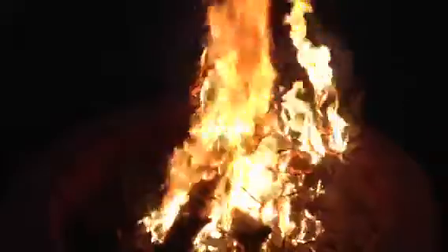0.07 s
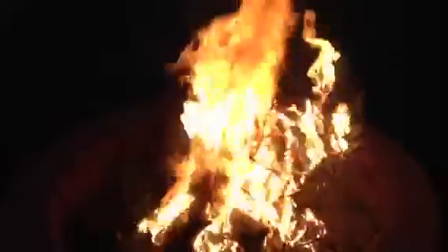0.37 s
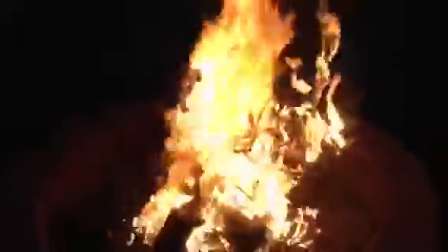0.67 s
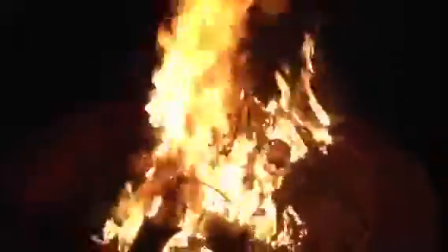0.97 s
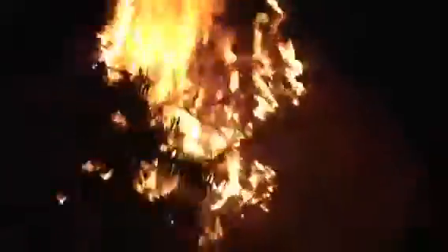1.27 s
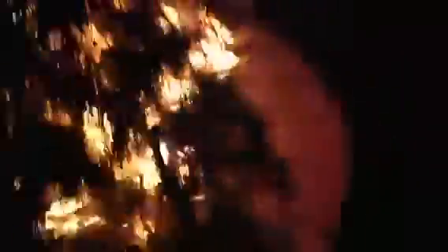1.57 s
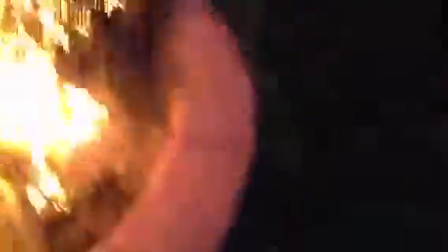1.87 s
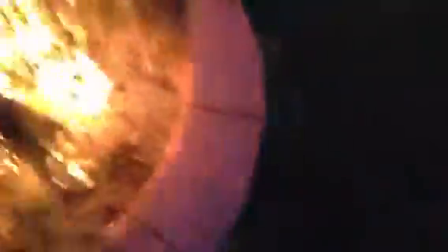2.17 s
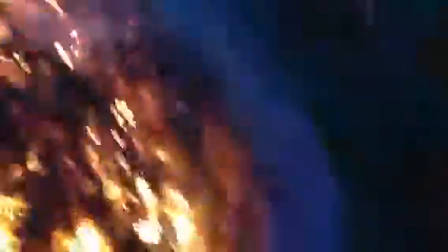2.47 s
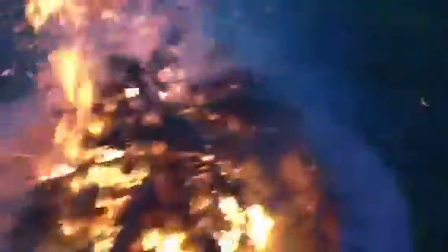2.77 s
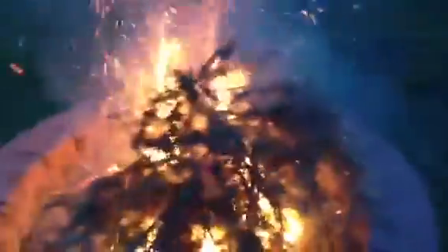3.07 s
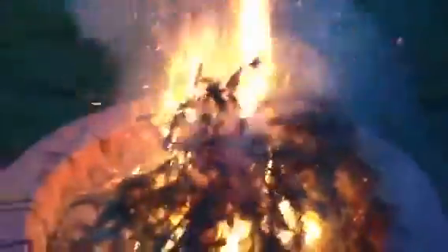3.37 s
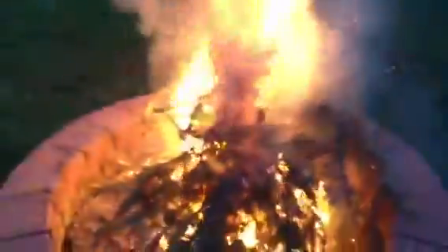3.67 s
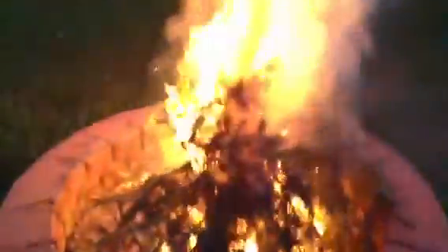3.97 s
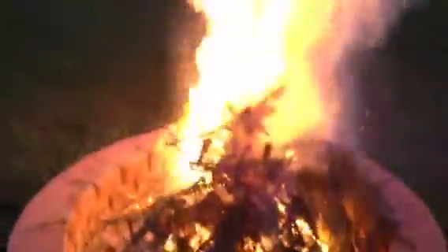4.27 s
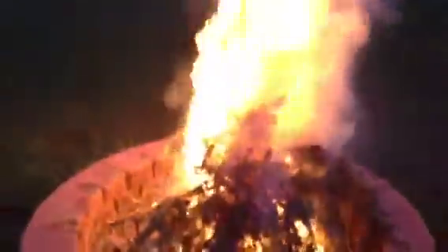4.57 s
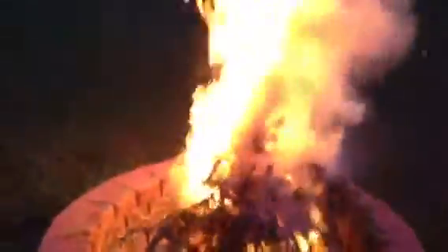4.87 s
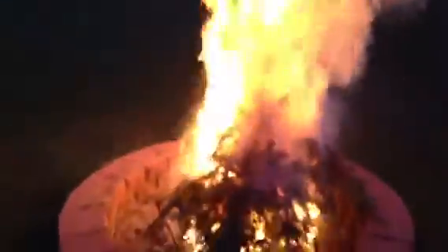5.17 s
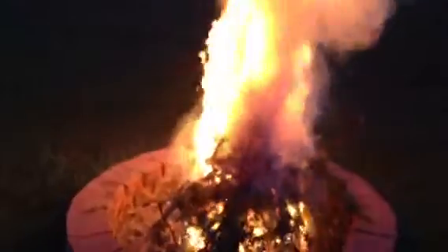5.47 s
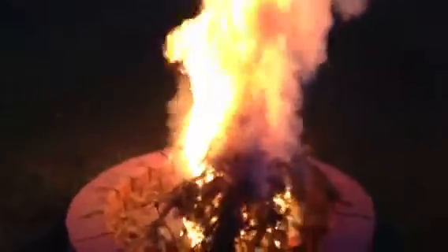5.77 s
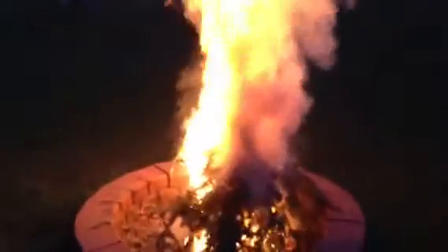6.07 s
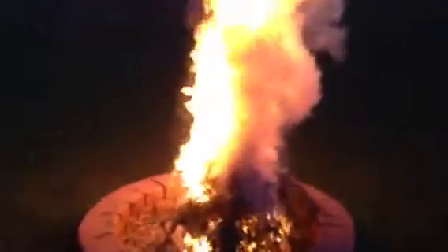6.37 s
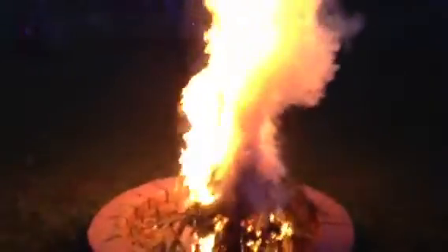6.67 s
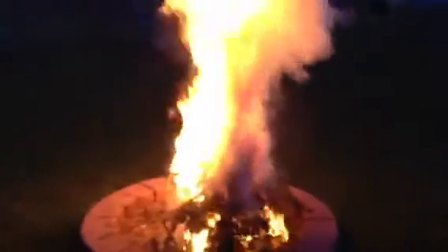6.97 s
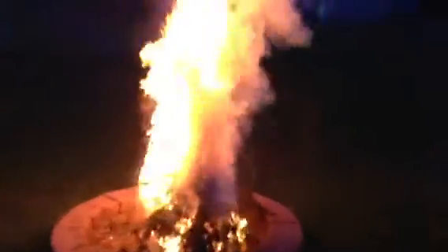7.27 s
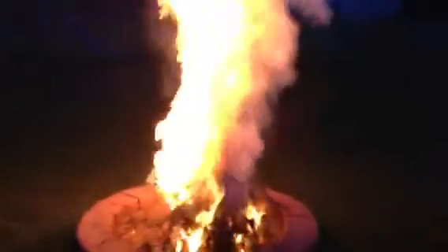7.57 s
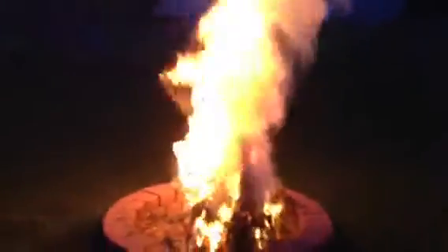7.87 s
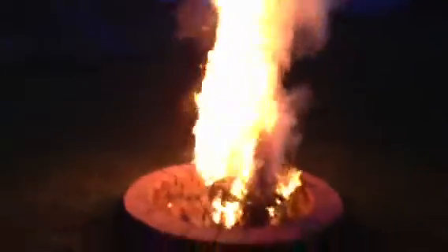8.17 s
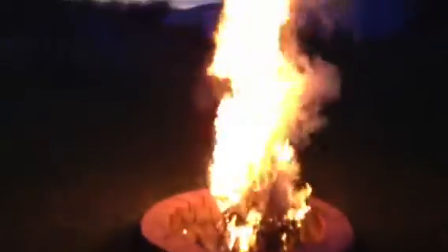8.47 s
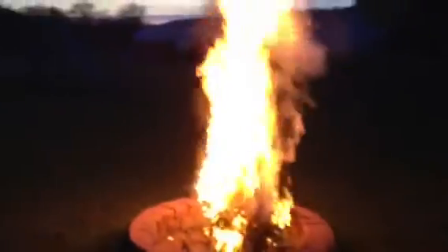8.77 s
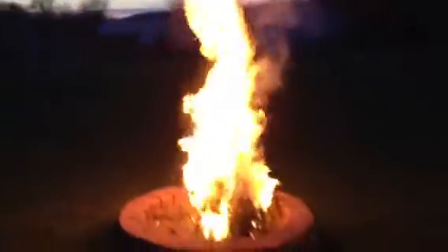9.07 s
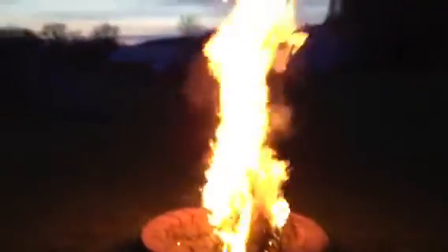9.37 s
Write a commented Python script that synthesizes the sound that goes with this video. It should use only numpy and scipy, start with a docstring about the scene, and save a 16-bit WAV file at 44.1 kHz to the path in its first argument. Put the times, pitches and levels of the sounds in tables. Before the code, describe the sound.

A close outdoor fire of dry branches pops sharply and catches into a thick, bright crackle while frogs peep in the background.

```python
"""Dusk beside a fire pit, one microphone close in, small frogs whistling all around it.
Dry evergreen branches smoulder: single needles tick and resin pockets pop. At 2.4 s they catch, and
thousands of needles burst over the low roar of the flames while whole sprigs spurt and a toad trills
in the distance. At 5.5 s, after a loud pop, the whole sound turns suddenly quieter. From about 7 s
a hand shifts beside the microphone, colours the sound and bumps the housing."""
import sys
import numpy as np
from scipy import signal
from scipy.fft import rfft, irfft, next_fast_len
from scipy.io import wavfile
from scipy.ndimage import map_coordinates

SR = 44100
rng = np.random.default_rng(int(sys.argv[2]) if len(sys.argv) > 2 else 0)


def generate_wav(sig):
    """Save sig (samples, or channels by samples) to the path in sys.argv[1] as 16-bit PCM at SR."""
    pcm = np.round(np.clip(np.atleast_2d(sig).T, -1, 1) * 32767).astype(np.int16)
    wavfile.write(sys.argv[1], SR, pcm)


N = 424683
TIME = np.arange(N) / SR
TOP_HZ = 15350  # the microphone's band limit


def amp(db):
    """Decibels as an amplitude factor."""
    return 10 ** (np.asarray(db) / 20)


def unit(x):
    """x at rms 1."""
    return x / np.sqrt(np.mean(x ** 2) + 1e-20)


def curves(rows, at=TIME):
    """Each column after the time, per sample or at the given times."""
    times, *columns = np.transpose(rows)
    return [np.interp(at, times, column) for column in columns]


def wobble(rate):
    """A smooth random curve, rate knots a second."""
    knots = rng.standard_normal(int(N * rate / SR) + 4)
    return map_coordinates(knots, [TIME * rate], order=2)


def colour(x, points, size=4096):
    """x through a causal filter of unit energy with the given (Hz, dB) shape."""
    points_hz, points_db = np.transpose(points)
    hz = np.fft.rfftfreq(size, 1 / SR)
    shape_db = np.interp(np.log(hz + 1), np.log(points_hz), points_db)
    cepstrum = irfft(np.log(amp(shape_db)))
    cepstrum[1:size // 2] *= 2  # fold to minimum phase
    cepstrum[size // 2 + 1:] = 0
    response = irfft(np.exp(rfft(cepstrum)))
    return signal.oaconvolve(x, response / np.linalg.norm(response))[:N]


def resonate(x, hz, q):
    """x through a single resonance."""
    return signal.lfilter(*signal.iirpeak(hz, q, SR), x)


def fade(x, life_s):
    """Every impulse of x spread over an exponential decay of this time constant."""
    keep = np.exp(-1 / (life_s * SR))
    return signal.lfilter([1 - keep], [1, -keep], x)


def add(track, s, sound):
    """Mix a sound into the track at time s."""
    start = max(round(s * SR), 0)
    part = track[start:start + len(sound)]
    part += sound[:len(part)]


def bursts(rate, spread_db, ceiling_db):
    """Energy of random bursts, mean 1: rate a second, many small and a few large."""
    size = amp(np.minimum(spread_db * rng.standard_normal(N), ceiling_db)) ** 2
    chance = rate / SR
    return (rng.random(N) < chance) * size / size.mean() / chance


def hiss(power):
    """White noise of random signs that follows a power envelope."""
    return np.sqrt(np.abs(power)) * np.sign(rng.standard_normal(N))


# How loud the crackle of needles and twigs is, close to the microphone, dropping abruptly at 5.5 s.
# Each row: time in seconds, needle level and twig level in relative dB.
CRACKLE_LEVEL = [(.13, -40.5, -51), (.58, -47, -52), (.72, -39.5, -49.5), (1.1, -46, -51.5),
                 (1.55, -43, -52.5), (1.85, -46.5, -53.5), (2.17, -42, -50.5), (2.36, -34.5, -48.5),
                 (2.42, -28, -45), (2.98, -26, -47.5), (3.3, -30, -47.5), (3.75, -25.5, -44.5),
                 (4.56, -26, -43), (4.62, -27, -43.5), (5, -25.5, -45), (5.42, -28.5, -45.5),
                 (5.5, -22.5, -47.5), (5.525, -32, -52.5), (6.3, -30, -49), (7.1, -31, -48.5),
                 (7.7, -30, -45), (8.3, -31, -44), (9.62, -32, -47.5)]
# The bright tone of the needles. Each row: frequency in Hz, relative level in dB.
NEEDLE_SPECTRUM = [(900, -40), (1900, -17), (2500, -12.5), (3400, -8.8), (4100, -6.2), (5700, -4.3),
                   (7000, -1.6), (8200, 0), (9900, -2.6), (11700, -.4), (13500, -.7), (15200, -2.5)]
# The lower tone of the twigs. Each row: frequency in Hz, relative level in dB.
TWIG_SPECTRUM = [(250, -30), (410, -13), (520, -3), (780, -.5), (1050, -2.5), (1350, -2), (1900, 0),
                 (2400, -.5), (3200, -9), (4200, -20), (7000, -35)]


def crackle(catch_db=-37):
    """Smouldering needles tick and vent steam; once they catch, they burst in dense clumps of clicks."""
    needle_db, twig_db = curves(CRACKLE_LEVEL)
    caught = 1 / (1 + np.exp((catch_db - needle_db) / 2))  # 0 smouldering, 1 alight
    # a sprig ignites at once, then its volley of clicks thins out
    volleys = .48 + .45 * fade(bursts(230, spread_db=1.5, ceiling_db=5), life_s=.0035)
    clumps = volleys * unit(amp(.65 * wobble(30))) ** 2
    click_rate = clumps * (1100 + 3900 * caught)
    clicks = clumps * bursts(click_rate, spread_db=8.5, ceiling_db=15 + 3 * caught)
    # each click scatters briefly through the pile
    direct, scatter = fade(clicks, life_s=.00003), fade(clicks, life_s=.00071)
    steam = fade(bursts(170 + 700 * caught, spread_db=6, ceiling_db=13), life_s=.0025)
    click_share, steady_hiss = .4 + .48 * caught, .1 - .05 * caught
    needle_power = click_share * (.75 * direct + .25 * scatter) + (1 - click_share) * steam + steady_hiss
    needles = colour(hiss(needle_power), NEEDLE_SPECTRUM)
    twigs = colour(hiss(.56 * direct + .33 * scatter + .39), TWIG_SPECTRUM)
    return amp(needle_db) * needles + amp(twig_db - 1) * twigs


# The big resin pockets bursting in the pit. Each row: start in seconds, levels of crack, steam and
# wood knock in relative dB, knock pitch in Hz.
RESIN_POPS = [(0.142, -14.5, -35.5, -36, 1800), (.168, -19, -36, -30, 1800), (0.4056, -20, -27, -34, 2200),
              (.6396, -6.5, -27, -22, 1700), (0.6478, -12, -32, -30, 1870), (0.7008, -8, -16, -15.5, 1280),
              (.853, -47, -56, -25.5, 1200), (0.9692, -22, -33, -33, 1500), (1.007, -33, -59, -26, 1350),
              (1.179, -48, -35, -29, 1340), (1.3037, -24, -29.5, -43, 1500),
              (1.4851, -17.5, -25.5, -21, 2200), (1.557, -16, -24.5, -29, 1500),
              (1.6773, -6, -23.5, -35, 2200), (1.703, -21, -37, -42, 2500), (1.878, -23, -31, -33, 1500),
              (1.899, -12, -20, -38, 2500), (1.9138, -21, -26, -38, 2010),
              (1.9295, -9.5, -26.5, -16.5, 1000), (2.012, -21, -26, -33, 1500),
              (2.127, -15.5, -35, -37, 2000), (2.1715, -19, -27, -24, 1500),
              (2.2037, -12, -31.5, -41, 2200), (2.255, -19, -29, -41, 1300), (2.2921, -10, -32, -36, 1380),
              (2.467, -2.5, -24, -42, 1300), (2.6415, -7.5, -25, -45, 1200), (2.787, -7.5, -19, -32, 1800),
              (2.82, -12, -21, -29, 700), (2.9065, -11, -26, -15, 2100), (2.9674, -20, -21, -23.5, 775),
              (2.981, -6.5, -27, -35, 2500), (3.988, -7, -26, -42, 1510), (4.418, -4, -33, -43, 1500),
              (4.43, -24, -31, -20.5, 900), (4.615, -12, -20.5, -50, 1500), (4.825, -8, -24, -40, 1500),
              (4.863, -13, -22, -31, 2800), (5.214, -11, -25, -28, 1700), (5.431, -14, -27.5, -44, 1500),
              (5.5073, -6, -29, -37, 1500), (6.995, -9, -24.5, -44, 1500), (9.1013, -10, -33, -42, 2000),
              (9.173, -9, -32, -44, 1500), (9.4924, -15, -31, -38, 1800), (9.543, -11, -37, -29, 1500)]
# The tone of a crack or needle snap at close range. Each row: frequency in Hz, relative level in dB.
SNAP_SPECTRUM = [(200, -42), (700, -6.5), (2000, -5), (6000, -1.5), (10000, -4), (15000, 2)]
# The tone of a knocking branch. Each row: frequency in Hz, relative level in dB.
KNOCK_SPECTRUM = [(150, -33), (450, 9.5), (1000, -1.5), (2500, -1.5), (3800, 3), (8000, -26)]


def resin_pops(crack_life_s=.00007, steam_life_s=.0034, knock_life_s=.0009):
    """A resin pocket splits with a sharp crack, steam whistles through the slit and the branch knocks."""
    sharp, dull = np.zeros(N), np.zeros(N)
    t = np.arange(SR // 40) / SR
    for s, crack_db, steam_db, knock_db, knock_hz in RESIN_POPS + small_pops():
        # a thick branch knocks harder and whistles lower: an octave for every 34 dB
        slit_hz = min(8760 * 2 ** (-(knock_db + 35.5) / 34), TOP_HZ)
        jet, wood = rng.standard_normal((2, len(t)))
        crack = np.cos(2 * np.pi * slit_hz * t) * np.exp(-t / crack_life_s)
        whistle = unit(resonate(jet, slit_hz, q=2))
        steam = (jet + .66 * whistle) * np.exp(-t / steam_life_s) * (1 - np.exp(-t / .0001))
        knock = resonate(np.sign(wood) * np.exp(-t / knock_life_s), knock_hz, q=2.2)
        add(sharp, s, amp(crack_db + 6) * crack + amp(steam_db + .5) * steam)
        add(dull, s, amp(knock_db + 4) * knock / np.linalg.norm(knock))
    return colour(sharp, SNAP_SPECTRUM) + colour(dull, KNOCK_SPECTRUM)


def small_pops(count=40, typical_db=(-18, -30, -39.5), scatter_db=2.5, knock_hz=1400):
    """Small pockets burst at random, louder where the crackle is loud: rows like those of RESIN_POPS."""
    jitter, pitch, *scatter = rng.standard_normal((count, 5)).T
    starts = np.clip((np.arange(count) + .5 + .5 * jitter) / count, 0, 1) * N / SR
    needle_db = curves(CRACKLE_LEVEL, at=starts)[0]
    lift_db = .22 * (needle_db - needle_db.mean())
    levels = np.array(typical_db)[:, None] + lift_db + scatter_db * np.array(scatter)
    return list(zip(starts, *levels, knock_hz * amp(3 * pitch)))


# Single dry needles that stand out of the crackle. Each row: start in seconds, relative level in dB.
NEEDLE_TICKS = [(0.158, -9), (0.215, -16), (0.2668, -29), (0.3107, -24), (0.3504, -15), (0.3956, -10),
                (0.4384, -21), (0.515, -12), (0.7327, -17), (0.818, -18), (0.8879, -25), (0.9065, -21),
                (1.0199, -19), (1.1667, -31), (1.2146, -22), (1.2443, -14.5), (1.3483, -32), (1.3736, -17),
                (1.4974, -24), (1.5724, -9), (1.649, -14.5), (1.882, -12), (1.9733, -18.5), (2.0823, -15),
                (2.1545, -15), (2.6489, -11), (2.922, -6), (2.9336, -8), (4.2143, -1.5), (4.3744, -6),
                (4.4014, -2.5), (4.492, -10), (5.4789, -14)]


def needle_ticks(snap_life_s=.0001, tail_life_s=.0021, ring_hz=5000):
    """A dry needle snaps, each at its own pitch, and the click scatters briefly through the pile."""
    track, t = np.zeros(N), np.arange(SR // 60) / SR
    envelope = np.exp(-t / snap_life_s) + amp(-13) * np.exp(-t / tail_life_s)
    for s, db in NEEDLE_TICKS:
        hz = min(ring_hz * amp(4 * rng.standard_normal()), TOP_HZ)
        click = np.sign(rng.standard_normal(len(t))) * envelope
        click = click + .86 * resonate(click, hz, q=2)
        add(track, s, amp(db + 4.5) * click / np.linalg.norm(click))
    return colour(track, SNAP_SPECTRUM)


# Whole sprigs going up in the pit. Each row: peak time in seconds, half width in seconds, level in dB.
SPRIG_SPURTS = [(2.44, 0.032, -27), (4.19, 0.014, -32), (4.385, 0.043, -33), (4.495, .012, -29),
                (4.77, 0.0065, -25.5), (4.87, 0.0094, -33), (5.49, 0.013, -30)]
# The tone of their sizzle. Each row: frequency in Hz, relative level in dB.
SPURT_SPECTRUM = [(1000, -40), (2500, -4), (4500, -3), (8000, 4.5), (11000, 0.5), (15000, -2.5)]


def sprig_spurts():
    """A sprig flares in a brief, dense volley of clicks."""
    swell = sum(amp(db) * np.exp(-.5 * ((TIME - s) / width) ** 2) for s, width, db in SPRIG_SPURTS)
    volley = fade(bursts(1500, spread_db=5, ceiling_db=10), life_s=.0003)
    return swell * colour(hiss(volley), SPURT_SPECTRUM)


# The deep roar over the pit. Each row: time in seconds, relative level in dB.
ROAR_LEVEL = [(.4, -54.5), (.85, -53.5), (2.3, -49), (2.8, -55.5), (3.5, -52), (4.5, -48), (5, -49.5),
              (5.7, -54), (7.2, -53.5), (7.5, -50.5), (7.9, -52), (9.62, -52.5)]
# The hollow flutter among the branches, strongest just before they catch.
# Each row: time in seconds, relative level in dB.
FLUTTER_LEVEL = [(1.1, -53.5), (2.15, -46.5), (2.55, -52.5), (3.3, -60), (4.5, -53), (5.4, -58), (6.2, -59)]
# Pockets of gas flaring. Each row: peak time in seconds, lift of the flutter in dB.
GAS_FLARES = [(3.91, 18.5), (4.3, 8), (4.53, 10)]
# The tones of the roar and the flutter. Each row: frequency in Hz, relative level in dB.
ROAR_SPECTRUM = [(20, -42), (50, -45), (70, -24), (100, -13), (135, -2), (190, 0.5), (250, 0), (320, -11),
                 (420, -32), (900, -37.5)]
FLUTTER_SPECTRUM = [(120, -28.5), (220, -18), (290, 2), (370, 0), (460, -3), (600, -11), (1200, -33)]


def flames(flare_half_width_s=.019):
    """Turbulent gas roars over the pit and flutters among the branches, swelling at each flare."""
    flare_db = sum(db * np.exp(-.5 * ((TIME - s) / flare_half_width_s) ** 2) for s, db in GAS_FLARES)
    roar_db = curves(ROAR_LEVEL)[0] - 1 + 1.5 * wobble(14)
    roar = amp(roar_db) * colour(rng.standard_normal(N), ROAR_SPECTRUM)
    flutter_db = curves(FLUTTER_LEVEL)[0] - .5 + flare_db + wobble(18)
    flutter = amp(flutter_db) * colour(rng.standard_normal(N), FLUTTER_SPECTRUM)
    return roar + flutter


# Soft bumps right on the microphone. Each row: start in seconds, relative level in dB, pitch in Hz.
HAND_BUMPS = [(7.322, -43, 130), (7.343, -41, 149), (7.373, -43, 170), (7.41, -46, 150), (7.454, -43, 200),
              (7.502, -40, 159), (7.535, -45, 140), (7.697, -44, 140), (7.728, -41, 130),
              (8.049, -39, 152.5), (8.394, -35.5, 161), (8.57, -37.5, 202), (8.731, -44, 125),
              (8.821, -45, 129)]


def hand_bumps(rise_s=.0031):
    """The hand nudges the housing: a low push of two or three cycles."""
    track, t = np.zeros(N), np.arange(SR // 16) / SR
    envelope = t / rise_s * np.exp(1 - t / rise_s)
    for s, db, hz in HAND_BUMPS:
        phase = 2 * np.pi * hz * (t + .0033 * (1 - np.exp(-t / .0024)))  # starts high, drops to hz
        add(track, s, amp(db + 4) * envelope * (np.sin(phase) + .034))
    return track


# The frogs nearest the microphone.
# Each row: start in seconds, length in seconds, starting pitch in Hz, level in dB.
NEAR_PEEPS = [(.08, 0.13, 2740, -46.5), (0.135, 0.12, 2940, -45.5), (.21, .16, 2780, -46.5),
              (0.438, 0.24, 2376, -49), (.71, .12, 2930, -54), (0.787, 0.2, 2706, -48),
              (0.785, .12, 2900, -49), (0.924, 0.11, 2780, -46), (1.05, .14, 2650, -55),
              (1.242, 0.24, 2474, -47), (1.27, .11, 2760, -51), (1.408, .16, 2750, -44.5),
              (1.47, .11, 2755, -46), (1.523, 0.18, 2910, -51), (1.685, 0.16, 2780, -51),
              (1.921, 0.16, 2545, -49), (1.94, 0.11, 2770, -52), (2.045, 0.14, 2760, -48),
              (2.177, .16, 2900, -51), (2.427, 0.11, 2830, -51), (2.703, .13, 2760, -49),
              (3.522, 0.098, 2710, -44), (4.19, 0.11, 2600, -48), (4.517, 0.12, 2760, -45),
              (5.534, .13, 2850, -51), (5.651, 0.12, 2660, -54), (6.258, .14, 2680, -48.5),
              (6.647, 0.11, 2720, -45), (7.253, .12, 2870, -55), (7.341, 0.12, 2750, -50),
              (8.298, 0.12, 2940, -51), (9.326, 0.12, 2780, -48)]
# How strongly the far chorus carries to the pit. Each row: time in seconds, gain in dB.
CHORUS_GAIN = [(2, 0), (2.7, 6), (5.3, 6), (5.7, 3), (7.4, 0), (8, -4)]


def frogs(far_calls=210, far_hz=2750, far_call_s=.147, echo_s=.5):
    """A few near frogs over a far chorus, with a faint echo from the trees."""
    near, far = np.zeros(N), np.zeros(N)
    for s, length_s, start_hz, db in NEAR_PEEPS:
        add(near, s, amp(db) * peep(length_s, start_hz))
    for k, (jitter, pitch, level) in enumerate(rng.standard_normal((far_calls, 3))):
        call = amp(-58 + 2 * level) * peep(far_call_s, far_hz * amp(.4 * pitch))
        add(far, (k + jitter) / far_calls * N / SR, call)
    calls = near + amp(curves(CHORUS_GAIN)[0]) * far
    calls *= amp(1.5 * wobble(70))  # the hot air over the pit makes the calls flutter
    t = np.arange(int(echo_s * SR)) / SR
    echo = rng.standard_normal(len(t)) * amp(-60 * t / echo_s)
    return calls + amp(-9) * signal.oaconvolve(calls, echo / np.linalg.norm(echo))[:N]


def peep(length_s, start_hz, rise_hz_per_s=2300, waver_hz=16):
    """One frog call: a whistle that swells and wavers as it slides upward."""
    progress = np.linspace(0, 1, int(length_s * SR))
    waver = np.interp(progress, np.linspace(0, 1, 20), rng.standard_normal(20))
    hz = start_hz + rise_hz_per_s * length_s * progress ** .93 + waver_hz * waver
    swell = np.abs(np.sin(np.pi * progress)) ** 1.1
    return swell * np.sin(2 * np.pi * np.cumsum(hz) / SR)


# One toad, far from the pit. Each row: time in seconds, level in dB.
TOAD_LEVEL = [(2.2, -62.5), (2.6, -58), (5.6, -69)]


def toad(trill_hz=1540, pulse_hz=31):
    """A far toad holds one pulsing note, blurred by distance."""
    pulses = 1 + np.sin(2 * np.pi * pulse_hz * TIME + wobble(1.87))
    note = np.sin(2 * np.pi * trill_hz * TIME + 1.2 * wobble(90))
    return amp(curves(TOAD_LEVEL)[0] + wobble(2.9)) * unit(pulses * note)


def scene():
    """The fire close by, the frogs and toad beyond it and the hand's bumps, in one channel."""
    fire = crackle() + sprig_spurts() + needle_ticks() + resin_pops() + flames()
    return (fire + frogs() + toad() + hand_bumps())[None]


def comb(hz, share, notch_hz, below_hz):
    """Power gain of a sound joined by its own reflection, which is weak above below_hz."""
    reflected = share / (1 + (hz / below_hz) ** 6)
    return np.abs(1 + reflected * np.exp(1j * np.pi * hz / notch_hz)) ** 2 / (1 + reflected ** 2)


# The pit and the ground reflect the low crackle; the echo lags more as the microphone moves.
# Each row: time in seconds, share reflected from 0 to 1, first notch in Hz.
GROUND_ECHO = [(2.05, .25, 970), (2.6, .35, 620), (3, .22, 510), (5.3, .15, 430), (5.65, .5, 410),
               (7.2, .45, 410), (7.7, .3, 400)]
# The palm reflects the crackle as it nears the microphone.
# Each row: time in seconds, share reflected from 0 to 1.
PALM_ECHO = [(7.1, 0), (7.19, .42), (7.3, .42), (7.42, .24), (7.55, 0)]
# The gap between hand and microphone.
# Each row: time in seconds, main notch in Hz, depth and ripple in dB before each band's weights.
HAND_GAP = [(7.16, 900, 0, 0), (7.22, 1090, -9, 0), (7.29, 1550, -1, -1), (7.38, 2110, 7, -3),
            (7.47, 2350, 7, -6), (7.51, 2700, 0, 1), (7.55, 4270, 10, -2), (7.65, 5600, 19, -5),
            (7.9, 5860, 9, 1.5), (8.2, 5240, 2, 10), (8.6, 5260, 5, 9), (9.62, 5330, 2, 11)]
# The notches and resonances of that gap. Each row: multiple of the main notch, relative width,
# weight of the depth, weight of the ripple.
GAP_BANDS = [(.48, .16, -.08, -.25), (.68, .11, .13, .15), (1, .085, -1.3, 0), (1.38, .14, .22, 0),
             (1.76, .06, -.15, -.65), (2.25, .16, 0, .48)]


def ground_and_hand(x, size=512):
    """Echoes off ground and palm comb the sound; as the hand closes in, the gap's bands slide upward."""
    hz, t, spectrum = signal.stft(x, SR, nperseg=size)
    hz = hz[:, None]
    notch_hz, depth_db, ripple_db = curves(HAND_GAP, at=t)
    power = comb(hz, *curves(GROUND_ECHO, at=t), below_hz=1300)
    power *= comb(hz, curves(PALM_ECHO, at=t)[0], notch_hz, below_hz=10000)
    for multiple, width, depth_weight, ripple_weight in GAP_BANDS:
        band = np.exp(-.5 * (np.log((hz + 1) / (multiple * notch_hz)) / width) ** 2)
        band_db = depth_weight * depth_db + ripple_weight * ripple_db
        power *= 1 + (amp(band_db) ** 2 - 1) * band
    return signal.istft(spectrum * np.sqrt(power), SR, nperseg=size)[1][:, :N]


def record(dry, opens_s=.118):
    """The microphone, coloured by ground and hand, opens after a moment and cuts off at TOP_HZ."""
    opened = np.clip((TIME - opens_s) / .008, 0, 1)
    size = next_fast_len(N + SR // 2)
    passband = np.clip((TOP_HZ - np.fft.rfftfreq(size, 1 / SR)) / 250 + .5, 0, 1)
    spectrum = rfft(ground_and_hand(dry) * opened, size)
    return irfft(spectrum * passband, size)[:, :N]


dry = scene()
out = record(dry)
generate_wav(out)
```